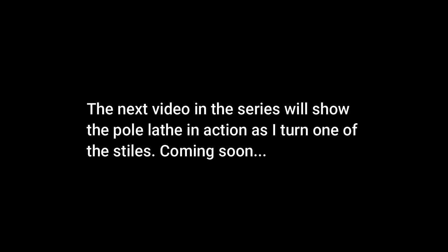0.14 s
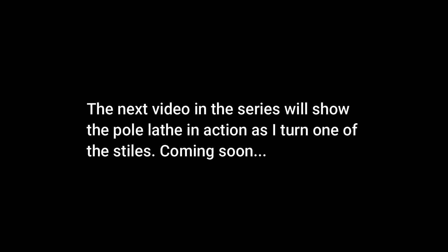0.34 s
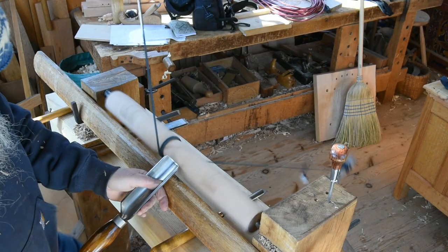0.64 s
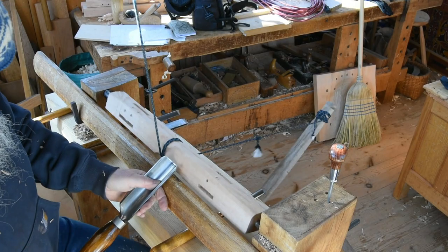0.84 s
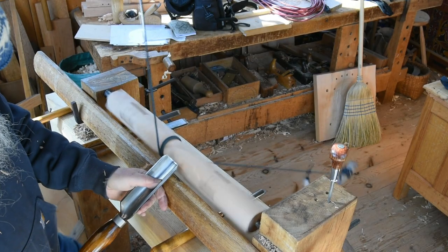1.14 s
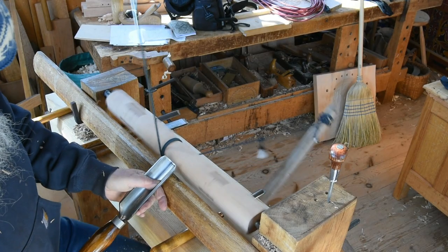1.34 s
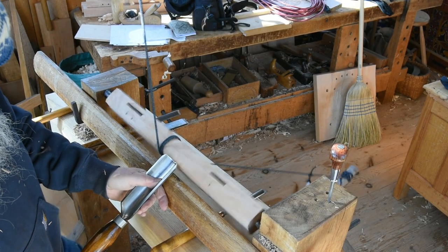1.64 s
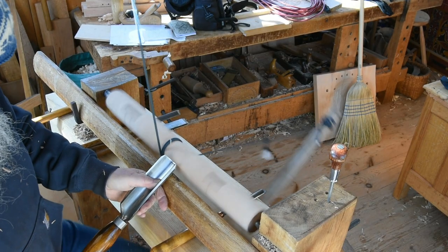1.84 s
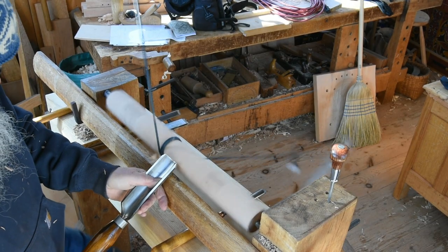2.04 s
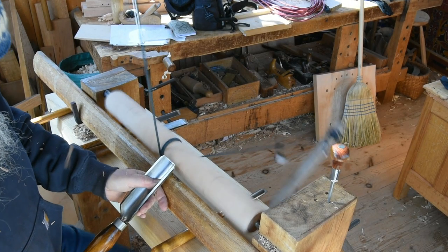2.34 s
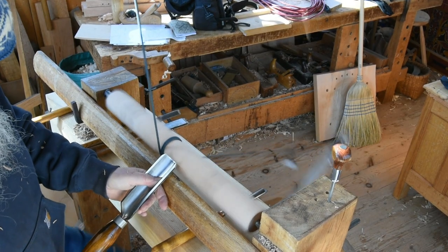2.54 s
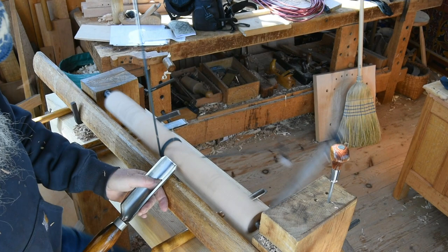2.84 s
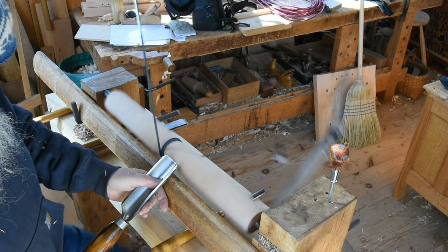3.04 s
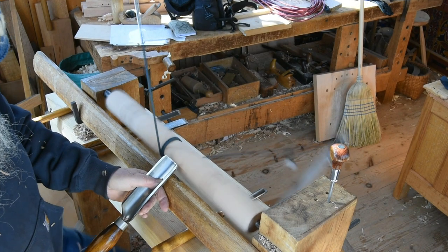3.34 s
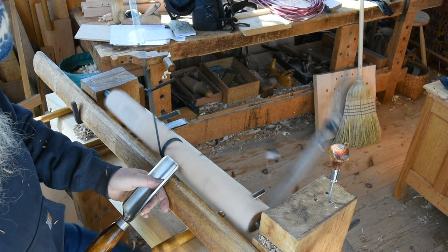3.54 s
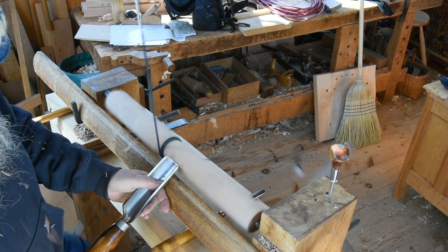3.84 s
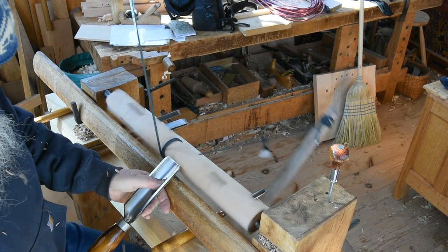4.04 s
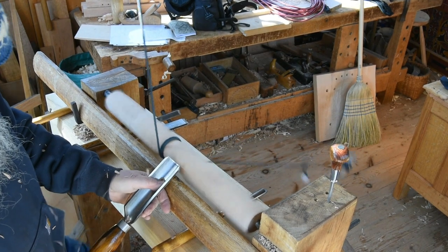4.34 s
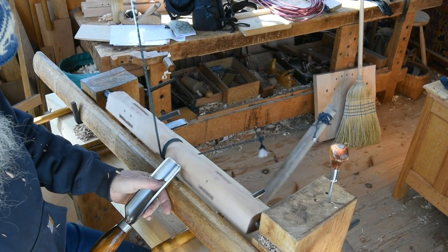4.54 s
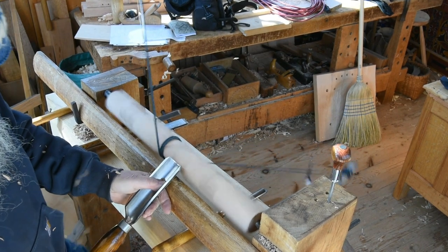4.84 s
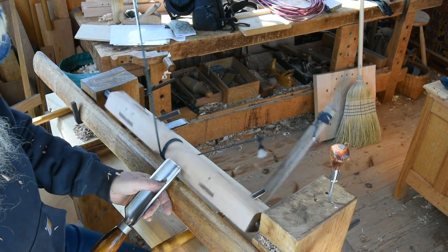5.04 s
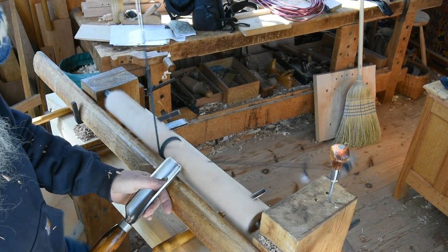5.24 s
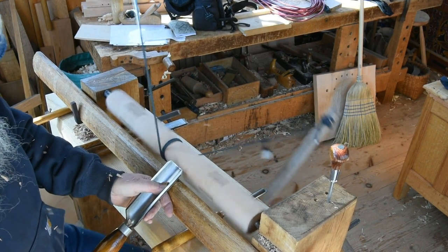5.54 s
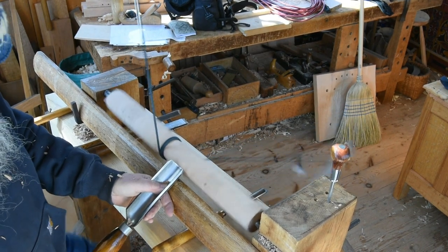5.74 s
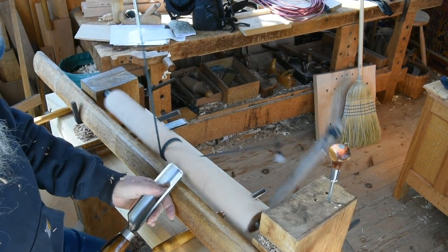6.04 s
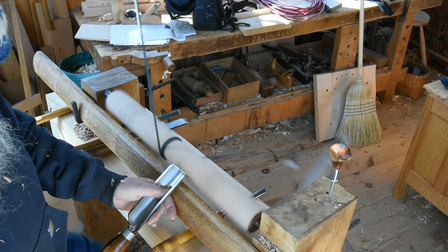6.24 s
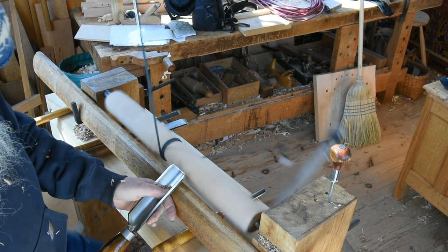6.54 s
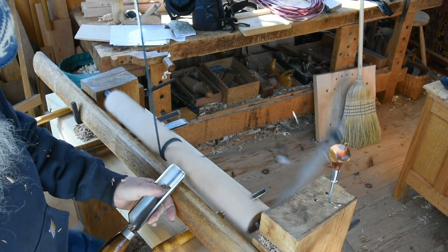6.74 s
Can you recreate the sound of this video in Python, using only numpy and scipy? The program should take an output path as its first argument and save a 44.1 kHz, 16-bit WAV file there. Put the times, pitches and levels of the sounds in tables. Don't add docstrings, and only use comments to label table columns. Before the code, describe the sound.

After brief silence, rhythmic rattling wood scrapes with steely ringing edges, dull knocks and soft brushing as a foot-powered lathe reverses.

```python
import sys
import numpy as np
from scipy import signal
from scipy.fft import rfft, irfft, next_fast_len
from scipy.io import wavfile
from scipy.ndimage import uniform_filter1d

SR = 44100
rng = np.random.default_rng(int(sys.argv[2]) if len(sys.argv) > 2 else 0)


def rack_gain(trim_db):
    fader = np.asarray(trim_db, float)
    return 10 ** (fader / 20)


def pcm_store(signal):
    levels = np.round(np.clip(np.atleast_2d(signal), -1, 1) * 32767)
    wavfile.write(sys.argv[1], SR, levels.astype(np.int16).T)


N = 303408


def evened(x):
    return x / np.sqrt(np.mean(x ** 2) + 1e-20)


def read(points, hz):
    f, value = np.transpose(points)
    return np.interp(np.log(hz + 1), np.log(f + 1), value)


def coloured(x, points):
    size = next_fast_len(len(x) + 4096)
    response = rack_gain(read(points, np.fft.rfftfreq(size, 1 / SR)))
    return irfft(rfft(x, size) * response, size)[:len(x)]


def smoothed(x, span):
    return uniform_filter1d(uniform_filter1d(x, span, axis=0), span, axis=0)


def wander(per_s):
    return np.clip(evened(smoothed(rng.standard_normal(N), int(SR / per_s))), -2, 1.5)


def grit(per_s, spread_db, smooth):
    size = rack_gain(spread_db * np.minimum(rng.exponential(1, N), 4)) * rng.choice([-1, 1], N)
    clicks = evened(size * (rng.random(N) < per_s / SR))
    return evened(clicks + smooth * rng.standard_normal(N))


def ring(modes_hz, shapes, weight_db=0, damping=1):
    hz = np.transpose([modes_hz])
    width, db = np.transpose(shapes)[..., None]
    width = np.maximum(width, 20) * damping
    t = np.arange(5000) / SR
    sign = (-1.) ** np.arange(len(hz))[:, None]
    level = sign * rack_gain(db + weight_db) * np.sqrt(width)
    return level * np.exp(-np.pi * width * t) * np.sin(2 * np.pi * hz * t)


ENVELOPE_RATE = 1000


def swelled(start_s, top_db, hold_s, rise, fade, swell_db=0.):
    since = np.arange(0, N / SR, 1 / ENVELOPE_RATE) - start_s[:, None]
    hold = np.clip(hold_s, .002, None)[..., None]
    db = top_db[:, None] - swell_db * np.clip(1 - since / hold, 0, 1)
    db = db - rise * np.maximum(-since, 0) - fade * np.maximum(since - hold, 0)
    return (rack_gain(db) ** 2).sum(0)


def gain(power, idle_db):
    points_s = np.arange(len(power)) / ENVELOPE_RATE
    return np.interp(np.arange(N) / SR, points_s, np.sqrt(power + rack_gain(idle_db) ** 2))


# frequency in Hz, level in dB per Hz.
AIR_SPECTRUM = [(18, -32), (30, -3.5), (303, -42), (584, -39), (1300, -19), (1800, -25.5), (6000, -37),
                (16000, -53)]
AIR_DB = -40


def still_air():
    return rack_gain(AIR_DB) * evened(coloured(rng.standard_normal(N), AIR_SPECTRUM))


# start in seconds, hold in seconds, pressure in dB, edge brightness in dB.
STROKES = [(0.548, 0.033, -15.5, -13), (0.956, 0.16, -17, -7), (1.48, 0.18, -16, -6.5),
           (1.98, 0.14, -18.5, -3), (2.535, 0.0067, -13, -11.5), (2.615, 0.014, -17, -5),
           (3.041, 0.17, -17.5, -5.5), (3.562, 0.16, -16, -6.5), (4.088, 0.16, -19.5, -1.5),
           (4.62, 0.21, -16, -6), (5.162, 0.13, -16, -3), (5.682, 0.16, -17.5, -5),
           (5.859, 0.032, -17.5, -13), (6.243, 0.0066, -9.5, -13), (6.322, 0.056, -16.5, -7),
           (6.5162, 0.021, -17.5, -8), (6.5964, 0.028, -14.5, -31), (6.772, 0.095, -12, -9.5)]
# start in seconds, blow in dB, loudest ring in Hz, rub in seconds, rub in dB.
THUMPS = [(0.681, -16, 1250, 0.033, -10), (0.696, -12, 596, 0.016, -20), (1.733, -1, 740, 0.032, -11.5),
          (4.461, -11.5, 1250, 0.015, -19), (4.479, -8, 793, 0.065, -10.5), (5.055, -7.5, 856, 0.059, -19),
          (5.419, -6.5, 847, 0.016, -19), (5.53, -1.5, 860, 0.068, -10.5), (6.074, -10, 1520, 0.066, -11),
          (6.099, -25, 1350, 0.01, -10), (6.131, -8.5, 1140, 0.031, -15.5)]
# start in seconds, tap in dB, brush in seconds, brush in
# dB, fibre minus brush in dB.
BRUSHES = [(0.742, -40, .006, -39, -7), (0.755, -40, 0.015, -30.5, -10), (0.827, -20, 0.034, -29.5, -19),
           (1.271, -34, 0.073, -32, -10), (1.376, -15.5, 0.18, -34, -14), (1.456, -37, 0.018, -33, -10),
           (1.79, -30, 0.034, -32.5, -11), (1.88, -15, 0.046, -27, -20), (2.235, -29, 0.0097, -30, -12),
           (2.302, -47, 0.13, -39, -11.5), (2.417, -16.5, 0.012, -26, -20),
           (2.846, -67, 0.055, -32.5, -7.5), (2.948, -15.5, 0.038, -31, -22),
           (3.371, -37, 0.043, -33, -6.5), (3.458, -16, 0.022, -30.5, -16), (3.497, -21, 0.008, -35.5, -7),
           (3.899, -52, 0.068, -36.5, -13), (3.971, -12.5, 0.072, -28, -34), (4.436, -40, 0.041, -33, -7.5),
           (4.47, -62, 0.062, -31, -33), (4.601, -32, 0.014, -42, -12), (4.96, -41, 0.077, -32, -10),
           (5.483, -37, 0.04, -33.5, -9), (6.03, -60, 0.039, -33.5, -10), (6.079, -58, 0.047, -32, -32),
           (6.168, -31, 0.0088, -56, -12), (6.436, -15, 0.011, -33, -30), (6.689, -40, .01, -36.5, -9),
           (6.743, -46, 0.017, -28.5, -12), (1.159, -40, 0.0089, -30.5, -7), (1.286, -36, .015, -38, -6),
           (2.338, -30, 0.011, -36, -13), (2.834, -35, .008, -42, -12), (2.975, -24, .01, -39, -13),
           (3.913, -30, .015, -35.5, -12), (4.046, -28, .015, -36, -14), (4.446, -26, .01, -38, -14),
           (5.452, -22, .01, -42, -20), (5.764, -18, .01, -38, -15)]
LAND, BRUSH_RISE, CREAK_RISE = 3000, 1200, 170
WOOD_FADE, STEEL_FADE, FIBRE_FADE, RUB_FADE, BRUSH_FADE = 132, 157, 220, 253, 223
WOOD_SWELL_DB, STEEL_SWELL_DB, FIBRE_SWELL_DB = -1.5, -0.5, -1
FIBRE_BELOW_PRESS_DB, FIBRE_FOLLOWS_EDGE = -15.5, 0.46
RUB_STEEL_DB, RUB_FIBRE_DB, BRUSH_WOOD_DB = -12, -46, 2.5
CREAK_S, CREAK_BELOW_GROAN_DB = 0.027, -3.5
IDLE_WOOD_DB, IDLE_STEEL_DB, IDLE_FIBRE_DB = -49, -51, -64


def contact():
    s, hold, press_db, bright_db = np.transpose(STROKES)
    rub_s, _, _, rub_hold, rub_db = np.transpose(THUMPS)
    brush_s, _, brush_hold, brush_db, brush_fibre_db = np.transpose(BRUSHES)
    groan_s, groan_db = np.transpose(TREADS)

    def cut(db, fade, swell_db):
        return swelled(s, db, hold, LAND, fade, swell_db)

    def brushing(db):
        return swelled(brush_s, db, brush_hold, BRUSH_RISE, BRUSH_FADE)

    rub = swelled(rub_s, rub_db, rub_hold, LAND, RUB_FADE, 1.5)
    brush = brushing(brush_db)
    creak = swelled(groan_s, groan_db + CREAK_BELOW_GROAN_DB, CREAK_S, CREAK_RISE, RUB_FADE)
    wood = cut(press_db, WOOD_FADE, WOOD_SWELL_DB) + rub + rack_gain(2 * BRUSH_WOOD_DB) * brush + creak
    steel = cut(press_db + bright_db, STEEL_FADE, STEEL_SWELL_DB) + rack_gain(2 * RUB_STEEL_DB) * rub + brush
    fibre_db = press_db + FIBRE_FOLLOWS_EDGE * bright_db + FIBRE_BELOW_PRESS_DB
    fibre = cut(fibre_db, FIBRE_FADE, FIBRE_SWELL_DB)
    fibre += rack_gain(2 * RUB_FIBRE_DB) * rub + brushing(brush_db + brush_fibre_db)
    return gain(wood, IDLE_WOOD_DB), gain(steel, IDLE_STEEL_DB), gain(fibre, IDLE_FIBRE_DB)


PATCH_HZ = [7000, 8500, 10000, 11800, 13600, 15500]


def patchy(x, patch_db):
    out = np.zeros(N)
    for k in range(len(PATCH_HZ)):
        slopes_db = -14 * abs(np.arange(len(PATCH_HZ)) - k)
        out += coloured(x, list(zip(PATCH_HZ, slopes_db))) * rack_gain(patch_db * wander(20))
    return evened(out)


STREAK_DB, STREAK_S = 4.5, 0.027


def streaked(x):
    _, _, z = signal.stft(x, SR, nperseg=256, noverlap=192)
    span = max(round(STREAK_S * SR / 64), 1)
    luck = np.clip(evened(smoothed(rng.standard_normal(z.shape[::-1]), span).T), -2, 1.4)
    return evened(signal.istft(z * rack_gain(STREAK_DB * luck), SR, nperseg=256, noverlap=192)[1][:N])


WOOD_HZ = [400, 477, 602, 717, 790, 849, 960, 1052, 1134, 1320, 1405, 1462, 1700, 2051, 2300, 2442, 2640]
# width in Hz, level in dB.
WOOD_SHAPES = [(59, 0), (44.5, -2), (40, 3), (37.5, -1.5), (41, 2.5), (47.6, 2.5), (60, -13), (33.4, 1.5),
               (48.3, 1), (89, 6.5), (43, 3.5), (60, 0), (144, -45), (109, -5), (127, -2.5), (49.3, -7),
               (92, -8.5)]
STEEL_HZ = [3150, 3335, 3640, 4070, 4390, 4740, 5080, 5336, 6120, 6621, 6900, 7800]
# width in Hz, level in dB.
STEEL_SHAPES = [(58.3, 3), (54.4, 7), (79.5, -2), (114, -3), (52.5, 6), (67.6, 3.5), (58.7, -4), (34, -4),
                (147, -6.5), (34.2, -9), (74.074, -47), (230, -4.5)]
# frequency in Hz, level in dB per Hz.
FIBRE_SPECTRUM = [(6000, 4.5), (6800, 3.5), (8600, 0), (10800, -7), (12300, -8), (13000, -3.5),
                  (13800, -13), (15700, -18)]
# frequency in Hz, level in dB per Hz.
RASP_SPECTRUM = [(200, -38), (330, -1.5), (600, 3.5), (1400, -5), (1900, -8), (2900, -16.5), (5450, -24),
                 (5600, -28.5), (7000, -31.5), (8000, -46)]
# frequency in Hz, level in dB.
WOOD_SHARE = [(1900, 0), (3600, -30)]
CORNER_S = .0203


def driven(drive, modes):
    modes = modes / np.linalg.norm(modes)
    return sum(signal.oaconvolve(drive * rack_gain(4.5 * wander(45)), mode)[:N] for mode in modes)


def cutting():
    wood_gain, steel_gain, fibre_gain = contact()
    pressed = np.clip(steel_gain / rack_gain(-9.0), .15, 1)
    t = np.arange(N) / SR
    blows_s = np.sort(np.transpose(blows_of_all_kinds())[0])
    since = t - blows_s[np.maximum(np.searchsorted(blows_s, t) - 1, 0)]
    corners = .55 + 1.3 * pressed * np.exp(-(since % CORNER_S) / .006)
    force = evened(grit(2200, 1.9, 1.1) * rack_gain(1.8 * wander(154))) * corners
    rasp = streaked(coloured(force, RASP_SPECTRUM))
    low = coloured(rasp, WOOD_SHARE)
    wood = 0.091 * driven(wood_gain * force, ring(WOOD_HZ, WOOD_SHAPES))
    wood += 0.5 * wood_gain * evened(low)
    steel = 0.5 * driven(steel_gain * pressed * force, ring(STEEL_HZ, STEEL_SHAPES))
    steel += 0.42 * steel_gain * evened(rasp - low)
    return wood + steel + 1.51 * fibre_gain * patchy(coloured(force, FIBRE_SPECTRUM), patch_db=4.5)


# blow in dB, loudest ring in Hz, steel minus blow in dB.
ENTRIES = [(-10, 770, 0), (1.5, 510, -10), (-5, 780, -1), (-1, 696, -2), (-4.5, 1620, -6), (-1, 1150, -9.5),
           (-5, 2200, -5), (0.5, 445, -11), (-7.5, 1400, -15), (-4.5, 1600, -22), (-9.5, 1500, -9),
           (-0.5, 512, -11), (-17, 600, 6), (-2.5, 1300, -11), (-23, 490, -5), (-7.5, 1500, -10),
           (-0.5, 1355, -8), (-1, 1350, -27)]
# start in seconds, blow in dB, loudest ring in Hz, steel minus blow in dB.
CATCHES = [(1.039, 0, 1310, -23), (1.159, -20, 1060, -6), (1.502, -7, 3300, 5), (1.558, -7, 970, 2),
           (1.58, -9, 696, 2), (1.644, -4, 603, -18), (2.022, -5.5, 1296, -25), (2.041, -18.5, 650, 14.5),
           (2.063, 0, 553, -22), (2.083, -7.5, 1160, -1), (3.066, -2, 1480, -9), (3.087, -4, 1450, -1.5),
           (3.143, -6.5, 1290, 0.5), (3.19, -2.5, 1020, -15), (3.226, -9, 1600, -25),
           (3.594, -0.5, 860, -7.5), (3.614, -6, 610, -1), (3.652, -5.5, 1340, -3), (4.122, -2, 745, -16),
           (4.145, -3.5, 1460, -3.5), (4.164, -0.5, 1320, -9.5), (4.633, -2, 1430, -13),
           (4.66, -5, 870, -23.5), (5.187, -8, 660, -10), (5.208, -7, 593, -1), (5.263, -3.5, 1350, -12),
           (5.714, -0.5, 604, -17), (5.797, -2.5, 530, -6), (6.796, -7.5, 1290, -13),
           (6.848, -0.5, 1305, -11)]
# start in seconds, blow in dB, loudest ring in Hz, steel minus blow in dB.
NICKS = [(1.0, -16, 830, -2), (1.06, -13.5, 1460, 1), (1.107, -15, 463, -5), (1.457, -15, 557, -9),
         (1.521, -10, 770, -4), (1.602, -11, 1500, -5), (1.996, -8.5, 592, -11), (2.103, -9, 810, -9),
         (3.107, -13, 1340, -3), (3.125, -12, 1120, -2), (3.163, -1, 1320, -3.5), (3.633, -3.5, 1330, -2),
         (3.671, -7.5, 556, -5), (4.094, -0.5, 620, -10), (4.187, -15, 1480, -8), (4.206, -9, 1400, -12),
         (4.227, -13, 1060, -4), (4.503, -15, 600, -12), (4.677, -12, 1000, -1), (4.698, -9.5, 620, -1),
         (4.721, -6, 2030, -2), (4.741, -4.5, 600, -3.5), (4.76, -13.5, 1150, 5), (4.784, -6, 603, -4),
         (4.801, -7, 1050, -17), (5.246, -6.5, 1380, 0), (5.304, -11, 790, 0.5), (5.325, -4, 1290, -8.5),
         (5.558, -6, 593, -14), (5.734, -22, 845, -13.5), (5.884, -12.5, 850, -14.5), (6.874, -8, 1110, -5),
         (4.638, -7, 1980, -10), (5.846, -15, 1300, -3), (2.547, -18, 1000, 3), (2.632, -10, 890, -7),
         (6.253, -10, 1210, -20), (6.608, -18, 1400, -12)]
ENTRY_T60_S, CATCH_T60_S, THUMP_T60_S, TAP_T60_S = .03, .032, .11, .08
SHARP, SOFT = (44, .0003), (12, .002)
TAP_HZ, THUMP_STEEL_DB, TAP_STEEL_DB = 900, -24, -31


def blows_of_all_kinds():
    entries = [(stroke[0], *entry, ENTRY_T60_S, *SHARP) for stroke, entry in zip(STROKES, ENTRIES)]
    corners = [(*row, CATCH_T60_S, *SOFT) for row in list(CATCHES) + list(NICKS)]
    thumps = [(s, db, hz, THUMP_STEEL_DB, THUMP_T60_S, *SHARP) for s, db, hz, _, _ in THUMPS]
    taps = [(s, db, TAP_HZ, TAP_STEEL_DB, TAP_T60_S, *SHARP) for s, db, *_ in BRUSHES]
    return entries + corners + thumps + taps


# frequency in Hz, t60 in seconds, level in dB.
BELL = [(5336, .04, -24), (6621, .07, -28), (13000, .012, -21), (11600, .01, -23), (8700, .015, -26)]
# frequency in Hz, level in dB per Hz.
CRACK_SPECTRUM = [(300, -18), (700, 8), (1500, 2), (2600, -7.5), (5300, -12), (6000, -24), (13000, -40),
                  (16000, -40)]
BELL_SPREAD, BELL_SPREAD_DB = .012, 4
STRIKE_DB, STRIKE_T60_S = -4, 0.019
PUSH_HZ, PUSH_T60_S, PUSH_DB = 76, 0.079, -18.5
CRACK_DB, CRACK_S = -9.5, 0.0017


def knocks():
    out, snaps, cracks = np.zeros((3, N + 12000))
    t = np.arange(5000) / SR

    def dying(db, hz, t60):
        return rack_gain(db - 60 * t / t60) * np.sin(2 * np.pi * hz * t)

    for s, blow_db, loud_hz, steel_db, t60, tick, rise_s in blows_of_all_kinds():
        at = round(s * SR)
        rattle, rise = rng.standard_normal(len(t)), np.minimum(t / rise_s, 1)
        force = rattle * rack_gain(-60 * t / np.clip(t60, .01, .3)) * rise
        snaps[at:][:len(t)] += rack_gain(blow_db + steel_db - 52.0) * force * (1 + 0.83 * np.exp(-t / 0.0011))
        cracks[at:][:len(t)] += rack_gain(blow_db + CRACK_DB) * rattle[::-1] * np.exp(-t / CRACK_S)
        force[10] += tick
        wood_db = 5.2 * rng.standard_normal((len(WOOD_HZ), 1))
        steel_spot_db = 5.2 * rng.standard_normal((len(STEEL_HZ), 1))
        wood_db += 10 * np.exp(-(np.log(WOOD_HZ / np.array(loud_hz)) / 0.14) ** 2)[:, None]
        wood = signal.fftconvolve(force, ring(WOOD_HZ, WOOD_SHAPES, wood_db, damping=1.7).sum(0))
        steel = signal.fftconvolve(force, ring(STEEL_HZ, STEEL_SHAPES, steel_spot_db, damping=2.8).sum(0))
        steel /= abs(steel).max()
        for hz, ring_s, db in BELL:
            luck, tune = rng.standard_normal(2)
            bell_hz = hz * (1 + BELL_SPREAD * tune * (hz > 8000))
            steel[:len(t)] += dying(db + BELL_SPREAD_DB * luck, bell_hz, ring_s)
        blow = wood / abs(wood).max() + rack_gain(steel_db) * steel
        blow[:len(t)] += dying(STRIKE_DB, loud_hz, STRIKE_T60_S) * rise
        blow[:len(t)] += dying(PUSH_DB, PUSH_HZ, PUSH_T60_S)
        out[at:][:len(blow)] += rack_gain(blow_db - 2.0) * blow
    return (out + coloured(snaps, FIBRE_SPECTRUM) + coloured(cracks, CRACK_SPECTRUM))[:N]


def scattered(x, decays):
    taps = np.zeros(SR // 2)
    at = np.arange(60, len(taps) - 20, 20)
    taps[at + rng.integers(0, 20, len(at))] = rng.choice([-1., 1.], len(at))
    hz, t, z = signal.stft(taps, SR, nperseg=256)
    t60 = np.maximum(read(decays, hz), .01)[:, None]
    tail = signal.istft(z * rack_gain(-60 * t / t60), SR, nperseg=256)[1]
    return signal.oaconvolve(x, tail / np.linalg.norm(tail))[:N]


# frequency in Hz, t60 in seconds.
ROOM = [(200, 0.63), (1000, 0.4), (4000, 0.4), (12000, 0.012)]
ECHO_DB = -6


def echoes(blows):
    spot = 2 * np.pi * 3.3 * np.arange(N) / SR
    return rack_gain(ECHO_DB) * (scattered(blows * np.cos(spot), ROOM) + scattered(blows * np.sin(spot), ROOM))


# start in seconds, groan in dB.
TREADS = [(0.58, -22.5), (0.925, -15.5), (1.47, -15), (2.0, -16), (2.56, -21), (3.048, -18), (3.53, -16),
          (4.11, -18), (4.67, -20.5), (5.2, -16.5), (5.43, -31), (5.66, -20), (6.35, -29), (6.65, -19.5),
          (6.85, -23.5)]
# start in seconds, floor level in dB.
BOTTOMS = [(.6, -19.5), (1.09, -20), (1.64, -17), (2.14, -19), (2.62, -24.5), (3.22, -18.5), (3.76, -18),
           (4.16, -24), (4.38, -23.5), (4.8, -18), (5.01, -31), (5.31, -19.5), (5.85, -17), (6.1, -29),
           (6.35, -22.5), (6.88, -30)]
GROAN_RISE, GROAN_FADE, FLOOR_RISE, FLOOR_FADE = 98, 46, 97, 84
FLOOR_HOLD_S, BED_BELOW_GROAN_DB = 0.037, -5
STROKE_BED_DB, STROKE_FLOOR_DB, THUMP_BED_DB, THUMP_FLOOR_DB = -11, -12.5, -12.5, -16.5
IDLE_BED_DB, IDLE_FLOOR_DB = -36, -29.5


def treading():
    groan_s, groan_db = np.transpose(TREADS)
    bottom_s, floor_db = np.transpose(BOTTOMS)
    s, hold, press_db, _ = np.transpose(STROKES)
    rub_s, _, _, rub_hold, rub_db = np.transpose(THUMPS)
    cut = swelled(s, press_db, hold, LAND, WOOD_FADE)
    knock = swelled(rub_s, rub_db, rub_hold, LAND, WOOD_FADE)
    floor = swelled(bottom_s - FLOOR_HOLD_S / 2, floor_db, FLOOR_HOLD_S, FLOOR_RISE, FLOOR_FADE)
    floor += rack_gain(2 * STROKE_FLOOR_DB) * cut + rack_gain(2 * THUMP_FLOOR_DB) * knock
    bed = swelled(groan_s, groan_db + BED_BELOW_GROAN_DB, 0, GROAN_RISE, GROAN_FADE)
    bed += rack_gain(2 * STROKE_BED_DB) * cut + rack_gain(2 * THUMP_BED_DB) * knock
    return gain(floor, IDLE_FLOOR_DB), gain(bed, IDLE_BED_DB)


GROAN_HZ, GROAN_S, GROAN_TONE_DB = 226.8, 0.036, -4
GROAN_TONE_RISE, GROAN_TONE_FADE = 320, 113


def groaning():
    groan_s, groan_db = np.transpose(TREADS)
    top_db = 2 * (groan_db + 8) + GROAN_TONE_DB
    held = swelled(groan_s - GROAN_S / 2, top_db, GROAN_S, GROAN_TONE_RISE, GROAN_TONE_FADE)
    turn = 2 * np.pi * GROAN_HZ * np.arange(N) / SR + 1.43 * wander(22.6)
    return gain(held, -80) * rack_gain(2 * wander(57)) * (np.sin(turn) + .35 * np.cos(2 * turn))


STEADY_S, STEADY_SHARE = .05, .8


def steadied(x):
    return evened(x / (smoothed(x ** 2, round(STEADY_S * SR)) + .01) ** (STEADY_SHARE / 2))


# frequency in Hz, width in Hz, level in dB.
FRAME = [(45.3, 42, 21), (65.7, 26, 18), (84, 19, -8), (112, 18, -72)]
# frequency in Hz, width in Hz, level in dB.
BED = [(173.8, 34.5, 7.5), (218.6, 49, 7), (260, 32, 1), (350, 560, 1)]


def shaking():
    frame_gain, bed_gain = treading()
    jolts = grit(120, 3.2, 1.0)

    def resonating(modes, lo_hz, hi_hz):
        body = sum(rack_gain(db) * evened(signal.lfilter(*signal.iirpeak(hz, hz / width, SR), jolts))
                   for hz, width, db in modes)
        band = signal.butter(2, [lo_hz, hi_hz], "bandpass", fs=SR, output="sos")
        return steadied(signal.sosfilt(band, body))

    return frame_gain * resonating(FRAME, 43.5, 110.0) + bed_gain * resonating(BED, 132, 546) + groaning()


# start in seconds, length in seconds, frequency in Hz, level in dB.
SINGING = [(.752, .015, 5990, -40), (1.043, 0.085, 4420, -34), (1.533, 0.15, 5290, -29),
           (1.576, 0.036, 6770, -25), (1.976, 0.14, 5336, -30), (2.008, 0.1, 4450, -28),
           (2.04, 0.039, 3364, -19.5), (2.076, 0.033, 2504, -21), (2.045, .03, 6660, -33),
           (3.048, 0.16, 5250, -29.5), (3.165, .035, 6700, -31), (3.197, 0.014, 3150, -29),
           (3.556, 0.028, 5300, -22), (3.602, 0.039, 5200, -33), (3.654, 0.041, 5300, -26),
           (3.665, .014, 6850, -29), (3.908, .02, 5860, -37), (4.1, 0.11, 5336, -28.5),
           (4.193, 0.083, 6720, -36), (4.166, 0.063, 1409, -18.5), (4.44, 0.017, 5940, -35),
           (4.629, 0.055, 5300, -32), (4.702, 0.084, 5336, -25.5), (4.7, .035, 3150, -25),
           (4.968, .02, 5900, -36), (5.158, 0.11, 5250, -26), (5.717, 0.05, 8800, -40),
           (5.842, 0.048, 5350, -30), (6.816, 0.059, 3210, -24), (6.867, 0.016, 4090, -22)]
SING_EDGE_S, SING_WAVER_DB = .006, 5.5


def singing():
    out, t = np.zeros(N), np.arange(N) / SR
    waver, drift = rack_gain(SING_WAVER_DB * wander(130)), 1.9 * wander(140)
    for s, length, hz, db in SINGING:
        span = slice(round(s * SR), round((s + length + 0.033) * SR))
        now = t[span]
        held = np.clip(np.minimum((now - s) / SING_EDGE_S, (s + length + 0.021 - now) / 0.031), 0, 1)
        elsewhere = (np.arange(N)[span] + round(hz * 37)) % N
        tone = np.sin(2 * np.pi * hz * now + drift[elsewhere])
        out[span] += rack_gain(db - 0.5) * held * waver[elsewhere] * tone
    return out


# start in seconds, frequency in Hz, t60 in seconds, level in dB.
RINGS = [(1.5, 5300, 0.32, -33), (2.615, 2220, 0.014, 0.5), (5.292, 5300, 0.21, -20),
         (5.798, 6800, 0.2, -30), (6.246, 5330, 0.24, -22.5), (6.52, 5335, 0.17, -25),
         (6.6, 5335, 0.22, -25), (6.8, 5380, 0.22, -20), (6.597, 1200, 0.19, -22), (1.272, 2870, .03, -24),
         (1.291, 2400, 0.022, -20), (1.8, 3500, .02, -24), (2.546, 2400, 0.032, -22),
         (3.037, 3400, .03, -19), (5.51, 1400, .03, -17), (5.452, 1900, .05, -33), (5.8, 3900, 0.025, -16),
         (7, 3100, .03, -18), (5.536, 2200, .03, -19), (0.78, 2190, .04, -20), (6.08, 2260, 0.044, -14),
         (3.614, 3300, .03, -17), (3.652, 3600, .03, -11), (5.247, 3800, .025, -21),
         (6.2408, 1330, 0.028, 0), (6.242, 620, .06, -9), (2.5335, 1500, 0.015, -8), (5.1, 1600, 0.028, -1),
         (6.7955, 1300, 0.028, -3)]


def lone_rings():
    out, t = np.zeros(N), np.arange(N) / SR
    for s, hz, t60, db in RINGS:
        since = np.maximum(t - s, 0)
        out += rack_gain(db - 60 * since / t60) * np.sin(2 * np.pi * hz * since) * np.minimum(since / 0.00085, 1)
    return out


# start in seconds, length in seconds, frequency in Hz, level in dB.
SQUEAKS = [
    (6.138, .08, 1134, -17.5),
    (6.32, .04, 4090, -29),
]


def squeaks():
    out, t = np.zeros(N), np.arange(N) / SR
    for s, length, hz, db in SQUEAKS:
        held = np.clip(np.minimum((t - s) / 0.0036, (s + length - t) / 0.0042), 0, 1)
        out += rack_gain(db + 2 * wander(90)) * held * np.sin(2 * np.pi * hz * t + .7 * wander(80))
    return out


# frequency in Hz, side minus mid in dB.
PORTS = [(60, -68), (110, -63), (200, -74), (380, -53), (700, -45), (1290, -27.5), (2380, -19.5),
         (4400, -17.5), (8120, -11), (15000, -6)]
# frequency in Hz, level in dB.
LEAN = [(500, -45.5), (1200, -29), (4500, -24), (7000, -21), (14000, -45)]


def two_ports(mid):
    roving = np.zeros(N)
    for k in range(2):
        turn = np.cos(2.37 * wander(7.05) + k * np.pi / 2)
        roving += turn * scattered(mid, [(500, 0.03), (10000, 0.036)])
    side = coloured(1.8 * roving, PORTS) - coloured(mid, LEAN)
    return np.array([mid + side, mid - side])


def scene():
    blows = knocks()
    lathe = cutting() + blows + singing() + lone_rings() + squeaks()
    return two_ports(lathe + echoes(blows) + shaking() + still_air())


def band_limit(x):
    return signal.sosfilt(signal.butter(12, 16520, fs=SR, output="sos"), x)


START_S, EDGE_HZ = .547, 15800


def record(dry):
    opened = dry * (np.arange(N) > START_S * SR)
    knee = .75
    over = np.maximum(abs(opened) - knee, 0)
    size = np.minimum(abs(opened), knee) + (1 - knee) * np.tanh(over / (1 - knee))
    limited = np.sign(opened) * size
    lowpass = signal.firwin(1023, EDGE_HZ, window=("kaiser", 9), fs=SR)
    return band_limit(signal.oaconvolve(limited, lowpass[None], "same"))


dry = scene()
out = record(dry)
pcm_store(out)
```